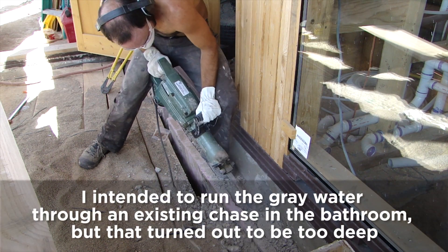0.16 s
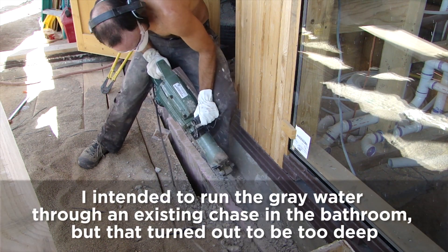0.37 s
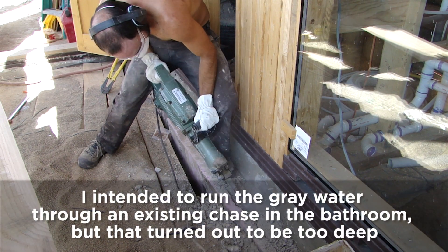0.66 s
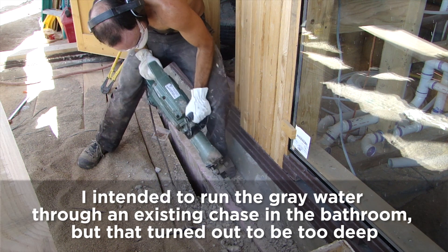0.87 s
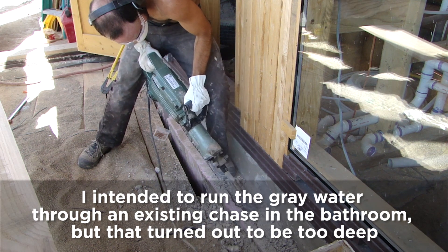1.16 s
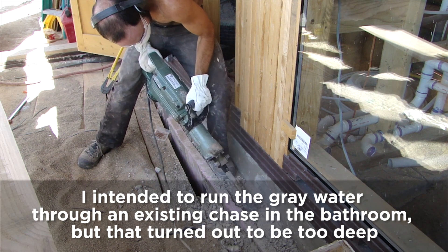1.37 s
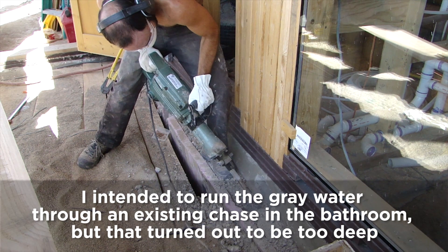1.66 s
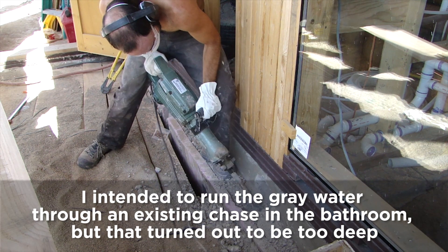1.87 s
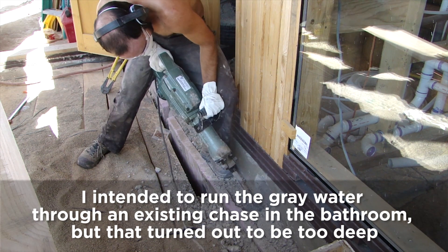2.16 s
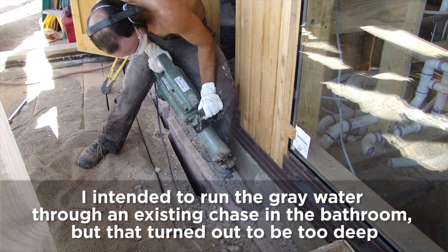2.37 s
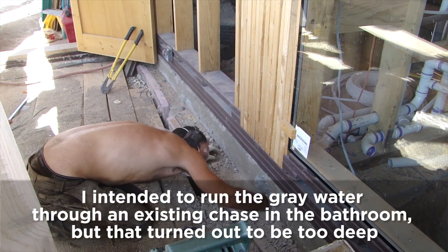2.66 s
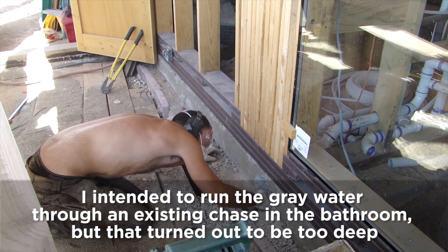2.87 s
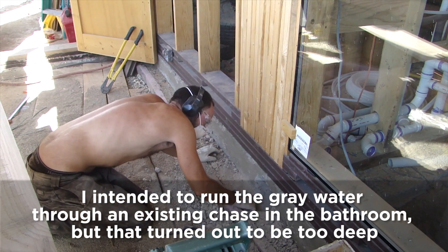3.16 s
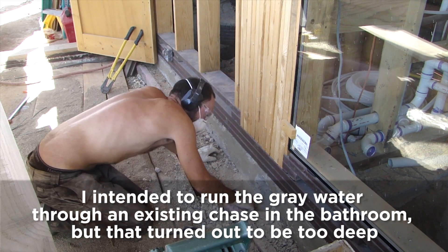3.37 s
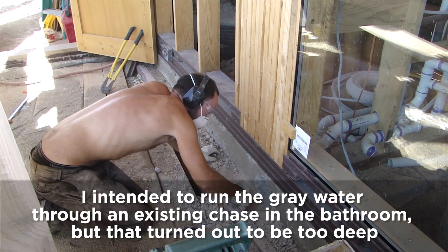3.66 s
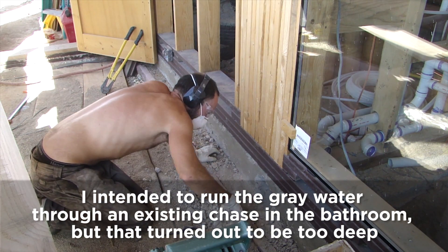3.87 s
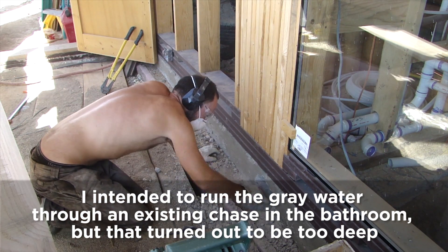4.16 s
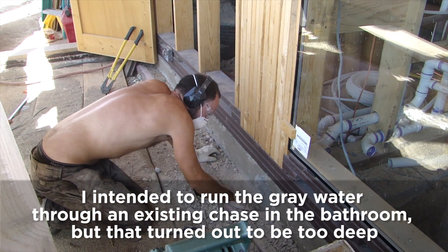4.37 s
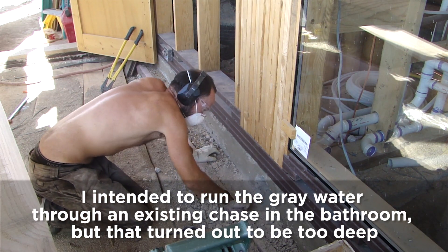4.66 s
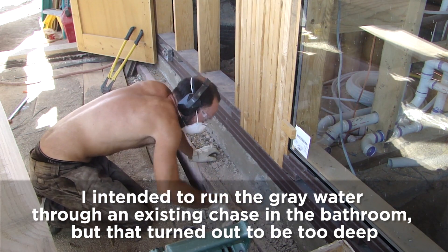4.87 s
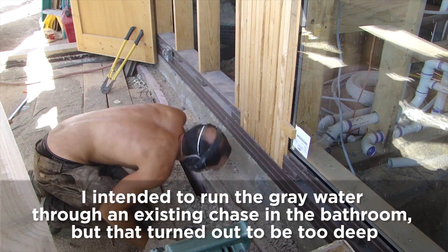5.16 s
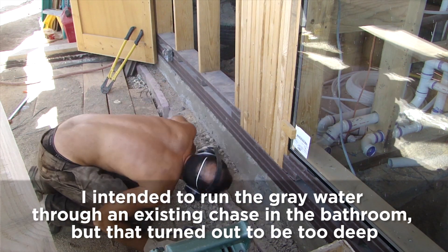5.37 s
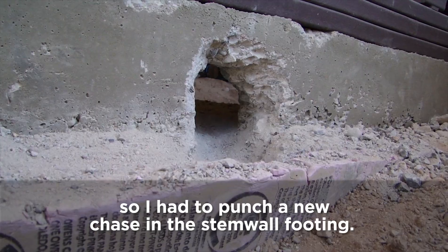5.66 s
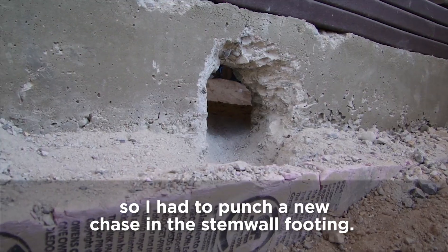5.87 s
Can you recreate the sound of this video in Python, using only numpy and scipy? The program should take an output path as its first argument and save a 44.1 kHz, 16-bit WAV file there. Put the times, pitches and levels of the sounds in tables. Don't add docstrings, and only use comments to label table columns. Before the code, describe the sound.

A demolition hammer cracks rapidly on concrete, rattles and grinds in the hole, then abruptly a hand rakes crunching rubble and knocks stones.

```python
import sys
import numpy as np
from scipy import signal
from scipy.fft import rfft, irfft, next_fast_len
from scipy.io import wavfile

SR = 44100
rng = np.random.default_rng(int(sys.argv[2]) if len(sys.argv) > 2 else 0)


def ratio_of_db(decibels):
    return 10 ** (np.asarray(decibels, float) / 20)


def store_wav(level_fs):
    pcm = np.round(np.clip(np.atleast_2d(level_fs), -1, 1) * 32767)
    wavfile.write(sys.argv[1], SR, pcm.T.astype(np.int16))


N = 265036
CUT_S = 2.731


def blows():
    # (time [s], chisel mode that rings out [0-3], its ring [dB], mode that joins in [0-3])
    hits = [(0.0845, 2, -32, 3), (0.1456, 1, -30, 2), (0.1945, 2, -28, 3), (0.2436, 2, -25, 3),
            (0.2907, 1, -30, 3), (0.3338, 0, -31, 2), (0.3717, 0, -17, 1), (0.4123, 1, -21, 0),
            (0.4554, 2, -26, 1), (0.5006, 1, -30, 0), (0.5393, 0, -29, 3), (0.58, 1, -34, 3),
            (0.6186, 2, -39, 0), (0.6594, 1, -29, 0), (0.7016, 1, -29, 0), (0.7426, 2, -31, 0),
            (0.7843, 0, -21, 1), (0.8311, 2, -33, 1), (0.8817, 0, -32, 1)]
    # (frequency [Hz], t60 [s])
    chisel = [(3900, .3), (6122, .3), (7475, .4), (8750, .3)]
    # (frequency [Hz], level [dB], t60 [s])
    chisel_weak = [(5012, -31, .15), (10950, -40, .2), (11530, -39, .1)]
    blow_db, blow_spread_db = -3.3, .4
    trigger_off_s, run_down_db_per_s2 = .6, 115
    crack_spread_octaves = .22
    second_mode_db, other_modes_db, other_spread_db = -4, -14, 4
    grip_detune = .003

    out = np.zeros(N)
    noise = rng.standard_normal((len(hits), 3, 2000))
    chance = rng.standard_normal((len(hits), 2, len(chisel) + len(chisel_weak)))
    starts = [round(row[0] * SR) for row in hits]
    stops = starts[1:] + [starts[-1] + SR // 8]
    for i, stop, row, (crack, tick, dull), (size, turn) in zip(starts, stops, hits, noise, chance):
        s, main_mode, ring_db, second_mode = row
        run_down_db = run_down_db_per_s2 * max(s - trigger_off_s, 0) ** 2
        peak_db = blow_db + blow_spread_db * size[-1] - run_down_db
        crack_hz = 3000 * 2 ** (crack_spread_octaves * turn[0])
        out[i:i + 2000] += ratio_of_db(peak_db + 2) * burst(crack, crack_hz, .8, .0003, .012)
        out[i:i + 2000] += ratio_of_db(peak_db - 9) * burst(tick, 10000, 0.29, 0.00026, 0.0097)
        out[i:i + 2000] += ratio_of_db(peak_db - 11) * burst(dull, 1950, 2.36, 0.0051, 0.37)

        is_other = np.arange(len(chisel)) != main_mode
        rings = ring_db + (other_modes_db + other_spread_db * size[3:]) * is_other
        rings[second_mode] = ring_db + second_mode_db
        modes = [(hz, db + 2, t60) for (hz, t60), db in zip(chisel, rings)]
        modes += [(hz, db + 4 * c, t60) for (hz, db, t60), c in zip(chisel_weak, size)]
        for (hz, db, t60), u in zip(modes, turn):
            out[i:stop] += chisel_ring(stop - i, hz * (1 + grip_detune * u), db, t60, u)
    return out


def chisel_ring(length, hz, db, t60, chance):
    t = np.arange(length) / SR
    flutter = 1 + .55 * np.sin(2 * np.pi * (45 + 15 * chance) * t + 5 * chance)
    swell = 1 - np.exp(-t / 0.001)
    return ratio_of_db(db - 60 * t / t60) * swell * flutter * np.sin(2 * np.pi * hz * t + 6 * chance)


def rattle():
    # (frequency [Hz], level [dB per Hz])
    roar_colour = [(24, -69.5), (40, -63.5), (339, -26.5), (541, -11.5), (1020, -9), (1560, -0.5),
                   (1760, 0), (3170, 5.5), (5440, -1.5), (7870, -14), (9580, -14.5), (11700, -20),
                   (14200, -51.5)]
    # (frequency [Hz], width [Hz], level [dB])
    housing = [(547, 35, 2), (430, 60, 0), (1085, 25, 0), (1308, 18, 2), (1577, 18, 5), (1855, 27, 2),
               (2098, 22, 2), (2380, 18, 3), (2912, 25, 2), (3047, 30, 3), (4250, 25, 1)]
    # (frequency [Hz], width [Hz], level [dB])
    shank_modes = [(2100, 570, -15.5), (3130, 160, -13), (4193, 500, -9.5), (5330, 450, -17.5),
                   (6200, 470, -22), (8950, 1600, -23)]
    roar = colour(grains(6000, 2.0, hiss=1.2, clump_db=1.3, clumps_per_s=120), roar_colour)
    roar = rms_one(resonate(roar, housing, gain_db=-2.0))
    taps = grains(250, .8, hiss=0, clump_db=0, clumps_per_s=50)
    shank = np.zeros(N)
    for hz, width, db in shank_modes:
        struck = taps * rng.uniform(-0.53, 1, N)
        soft = resonance(resonance(struck, hz, width), hz, width)
        shank += ratio_of_db(db) * rms_one(soft)
    return in_bands(roar + shank, rattle_levels(), (370, 1300, 6000))


def rattle_levels():
    # (time [s], housing roar [dB])
    effort_curve = [(0.0, -18.5), (0.13, -21.5), (0.45, -24), (0.594, -21), (0.74, -30), (0.87, -28.5),
                    (0.93, -37), (1.15, -29.5), (1.405, -23), (1.6, -21.5), (1.775, -22), (1.93, -28.5),
                    (1.945, -23), (2.01, -19), (2.144, -17.5), (2.344, -21), (2.58, -23), (2.73, -25.5)]
    # (from time [s], slab boom [dB], chatter [dB],
    # boom change [dB/s], chatter change [dB/s])
    contact = [
        (0.0, -31, -32, -8.5, -5),
        (0.905, -42, -37, 7.5, -3.5),
        (1.772, -30.5, -35.5, -21, -47),
        (1.94, -33.5, -36.5, -5.5, 4.5),
    ]
    ground_db = [-18.5, -25, -14.5, -17.5]
    middle_effort_db = -23
    boom_follows, chatter_follows = 0.51, 1

    t = np.arange(0, CUT_S, .002)
    effort = np.interp(t, *np.transpose(effort_curve))
    state = np.searchsorted(np.array(contact)[1:, 0], t)
    since, boom, chatter, boom_per_s, chatter_per_s = np.array(contact)[state].T
    swing, held = effort - middle_effort_db, t - since
    boom = boom + boom_per_s * held + boom_follows * swing
    chatter = chatter + chatter_per_s * held + chatter_follows * swing
    ground = boom + np.array(ground_db)[state]
    return np.column_stack([t, ground, boom, effort, chatter])


def loose_bit():
    # (time [s], peak [dB], centre [Hz])
    bit_knocks = [(0.029, -14, 3410), (0.065, -6.5, 2100), (0.992, -21, 3080), (1.143, -16.5, 3160),
                  (1.295, -15, 3850), (1.452, -15.5, 3050), (1.698, -13, 2130), (1.934, -11, 2600),
                  (1.965, -4.5, 3140), (1.984, -18, 4190), (2.011, -6, 3120), (2.057, -21, 4150),
                  (2.072, -3.5, 3060), (2.089, -13, 3270), (2.174, -23, 2800), (2.301, -26, 2690),
                  (2.452, -15, 4340), (2.58, -10, 3300), (2.62, -25, 3230), (2.661, -8.5, 3140),
                  (2.702, -7.5, 3220)]
    # (time
    # [s], peak [dB], centre [Hz], t60 [s])
    clank = [(1.7635, -4, 2300, 0.02), (1.764, -11, 8100, 0.02), (1.7645, -8, 1000, 0.06),
             (.0862, -4, 4500, .025), (1.967, -16, 7500, .015)]
    # (time
    # [s], peak [dB], frequency [Hz], t60 [s])
    hollow = [(1.705, -23, 560, .18), (1.77, -36, 240, .5), (1.99, -22, 550, .35), (2.01, -28, 420, .2),
              (2.729, -22, 11000, .004)]
    short_knocks = [row + (0.025,) for row in bit_knocks]
    return knocks(short_knocks, octaves=0.62) + knocks(clank, octaves=.55) + knocks(hollow, octaves=.15)


def raking():
    # (frequency [Hz], level [dB per Hz])
    crunch_colour = [(24, -85), (40, -64), (140, -39), (193, -22.5), (279, -19.5), (339, -13.5),
                     (1520, -2.5), (1630, -7.5), (2800, -4.5), (7870, -10.5), (11100, -10), (12500, -15.5),
                     (14200, -70)]
    # (frequency [Hz], width [Hz], level [dB])
    trench = [(637, 14, -6), (839, 32, -8.5), (1176, 11, 0), (1320, 9.9, -7), (1560, 21, -3.5),
              (1770, 190, -8), (2670, 25, -7), (3520, 18, -3)]
    crunch = colour(grains(3000, 1.7, hiss=0.9, clump_db=1.3, clumps_per_s=40), crunch_colour)
    return in_bands(resonate(crunch, trench, gain_db=6), rake_levels(), (900, 2300, 5500))


def rake_levels():
    # (time at full strength [s], swell [s], hold [s], level [dB],
    # grit against level [dB])
    strokes = [(2.732, 0.017, .012, -37.5, -16.5), (2.944, 0.57, 0.37, -42, -15.5),
               (3.01, 0.0098, 0.014, -45, 3), (3.17, 0.11, .006, -42.5, -16),
               (3.232, 0.04, 0.016, -41.5, -7.5), (3.425, 0.073, 0.06, -38, -11.5),
               (3.474, 0.033, 0.14, -33.5, -11.5), (3.644, 0.033, 0.0096, -28.5, -5),
               (3.867, 0.061, .006, -47.5, -2.5), (4.011, .06, 0.042, -55, 6),
               (4.092, .006, 0.038, -44.5, -8), (4.138, 0.046, 0.022, -41.5, -7.5),
               (4.262, .004, .03, -46.5, -11), (4.376, 0.053, 0.054, -34, -5),
               (4.486, 0.078, 0.09, -31.5, -10.5), (4.721, 0.052, 0.0073, -32.5, -3.7),
               (4.82, 0.019, 0.0086, -52.5, -14), (4.888, .011, 0.064, -60, 9),
               (4.95, 0.014, 0.01, -49, -16), (5.06, .03, 0.065, -59, -8), (5.221, 0.029, .012, -48.5, -13),
               (5.402, 0.24, .22, -57, -15), (5.682, 0.013, .004, -56, -13), (5.734, .011, .004, -62, -11)]
    # (level against stroke [dB], share of grit [dB/dB], share of hold [ratio],
    # dying [dB/s])
    rubble_layers = [
        (-9.5, -0.45, 0.87, 164),
        (-2.5, -0.048, 0.99, 154),
        (0.5, 0.42, 1, 199),
        (-0.6, 1, 0.98, 193),
    ]
    swell_db = 14
    lift_s, lift_db_per_s = 5.606, 1500
    rumble_lag, gentle_stroke_db = 0.11, -42

    t = np.arange(CUT_S, N / SR, .002)
    s, swell, hold, stroke_db, grit = np.transpose(strokes)[:, :, None]
    rising = np.maximum(s - t, 0) / np.maximum(swell, .003)
    db = stroke_db - lift_db_per_s * (s < lift_s) * np.maximum(t - lift_s, 0)
    layers = []
    for over, share, lasts, fall in rubble_layers:
        dying_db = fall * np.maximum(t - s - lasts * hold, 0)
        layers.append(ratio_of_db(db + over + share * grit - swell_db * rising - dying_db))
    layers[0] = layers[0] * ratio_of_db(-rumble_lag * (stroke_db - gentle_stroke_db))
    totals = [10 * np.log10(np.sum(a ** 2, axis=0) + 1e-12) for a in layers]
    return np.column_stack([t] + totals)


def stones():
    # (time [s], peak [dB], centre [Hz], t60 [s])
    clicks = [(3.01, -47, 1320, 0.04), (3.209, -44, 1240, 0.04), (3.319, -46, 1180, 0.03),
              (3.406, -31, 1850, 0.037), (3.562, -24.5, 810, 0.062), (3.643, -13, 2700, 0.087),
              (3.857, -28, 2920, 0.03), (4.079, -30, 1560, 0.046), (4.266, -47, 1490, 0.027),
              (4.503, -17, 3000, 0.025), (4.717, -25, 1560, 0.04), (4.876, -29.5, 6000, 0.02),
              (4.914, -44, 3680, 0.049), (4.948, -36.5, 1480, 0.045), (4.682, -41, 4000, .02),
              (5.059, -43, 2960, 0.04), (5.101, -43.5, 2430, 0.04), (5.203, -38, 1810, 0.04),
              (5.684, -44, 1560, 0.028)]
    # (time [s], peak [dB], centre [Hz], t60 [s])
    thump = (5.682, -55, 120, .06)
    # (time [s], peak [dB], frequency [Hz], t60 [s])
    lump = (3.853, -44, 350, .12)
    return echoes(knocks(clicks, octaves=0.52)) + knocks([thump], octaves=0.58) + knocks([lump], octaves=0.12)


def quiet_site():
    # (frequency [Hz], level [dB per Hz])
    site_colour = [(18, -49), (30, -20), (197, 6.5), (596, 7.5), (733, 3), (3270, -2.5), (10700, -11.5),
                   (12200, -21), (14200, -55)]
    return ratio_of_db(-57 - 3) * rms_one(colour(rng.standard_normal(N), site_colour))


def knocks(rows, octaves):
    out, noise = np.zeros(N), rng.standard_normal((len(rows), 4000))
    for (s, db, hz, t60), draw in zip(rows, noise):
        i = round(s * SR)
        out[i:i + 4000] += ratio_of_db(db) * burst(draw, hz, octaves, 0.00012, t60)
    return out


def burst(noise, hz, octaves, rise_s, t60):
    t = np.arange(len(noise)) / SR
    edges = np.clip(hz * 2. ** np.array([-octaves, octaves]), 30, .44 * SR)
    shape = (1 - np.exp(-t / rise_s)) * ratio_of_db(-60 * t / max(t60, .004))
    puff = signal.sosfilt(signal.butter(2, edges, "band", fs=SR, output="sos"), noise * shape)
    return puff / np.max(np.abs(puff))


def grains(per_s, spread_db, hiss, clump_db, clumps_per_s):
    sizes = ratio_of_db(spread_db * np.minimum(rng.exponential(1, N), 5)) * rng.choice([-1, 1], N)
    contacts = rms_one(sizes * (rng.random(N) < per_s / SR))
    return (contacts + hiss * rng.standard_normal(N)) * ratio_of_db(clump_db * drift(clumps_per_s))


def drift(rate):
    r = np.exp(-2 * np.pi * rate / SR)
    slow = signal.lfilter([1], [1, -2 * r, r * r], rng.standard_normal(N + SR))
    return rms_one(slow[SR:])


def echoes(x):
    dull = signal.sosfilt(signal.butter(1, 5000, fs=SR, output="sos"), x)
    out = x.copy()
    for lag_s, db in [(.0113, -13), (.0171, -14), (.0263, -16), (.039, -18)]:
        lag = round(lag_s * SR)
        out[lag:] += ratio_of_db(db) * dull[:-lag]
    return out


def resonate(x, peaks, gain_db):
    return x + sum(ratio_of_db(db + gain_db) * resonance(x, hz, width) for hz, width, db in peaks)


def resonance(x, hz, width):
    r, w = np.exp(-np.pi * width / SR), 2 * np.pi * hz / SR
    return signal.lfilter([(1 - r * r) / 2, 0, (r * r - 1) / 2], [1, -2 * r * np.cos(w), r * r], x)


def in_bands(x, rows, split_hz):
    lows = [spectral(x, lambda hz: 1 / (1 + (hz / edge) ** 8)) for edge in split_hz]
    below = [0] + lows + [x]
    return sum(ratio_of_db(db) * rms_one(b - a) for db, a, b in zip(in_time(rows), below, below[1:]))


def in_time(rows):
    s, *columns = np.transpose(rows)
    return [np.interp(np.arange(N) / SR, s, c) for c in columns]


def colour(x, spectrum):
    points, db = np.transpose(spectrum)
    return spectral(x, lambda hz: ratio_of_db(np.interp(np.log(hz), np.log(points), db)))


def spectral(x, gain):
    size = next_fast_len(N)
    return irfft(rfft(x, size) * gain(np.fft.rfftfreq(size, 1 / SR) + 1), size)[:N]


def rms_one(x):
    return x / np.sqrt(np.mean(x ** 2) + 1e-20)


def scene():
    before = np.arange(N) < CUT_S * SR
    hammer = rattle() + echoes(blows() + loose_bit())
    rubble = raking() + stones()
    return (np.where(before, hammer, rubble) + quiet_site())[None]


def band_limit(x):
    return signal.sosfilt(signal.butter(12, 14340, fs=SR, output="sos"), x)


def record(dry):
    ceiling = dry / (1 + np.abs(dry / .64) ** 4) ** (1 / 4)
    thin = signal.sosfilt(signal.butter(1, 110, "high", fs=SR, output="sos"), ceiling)
    top = signal.cheby2(8, 35, 13300 + 400, fs=SR, output="sos")
    return band_limit(signal.sosfilt(top, thin))


dry = scene()
out = record(dry)
store_wav(out)
```